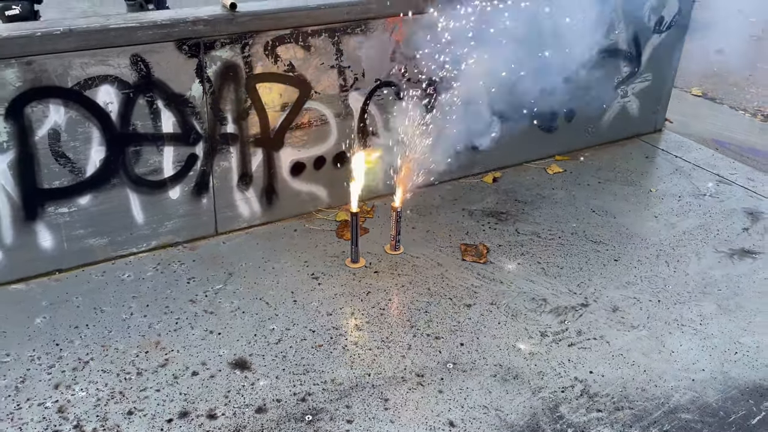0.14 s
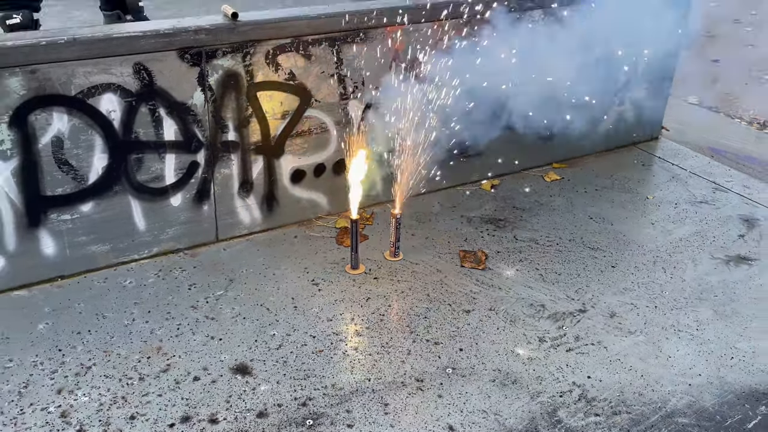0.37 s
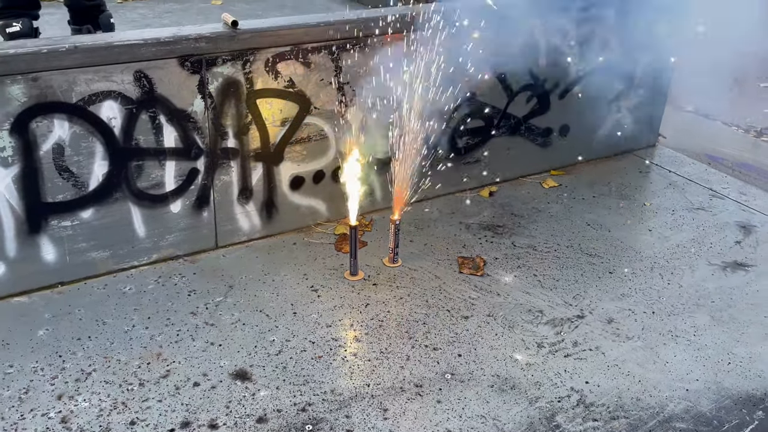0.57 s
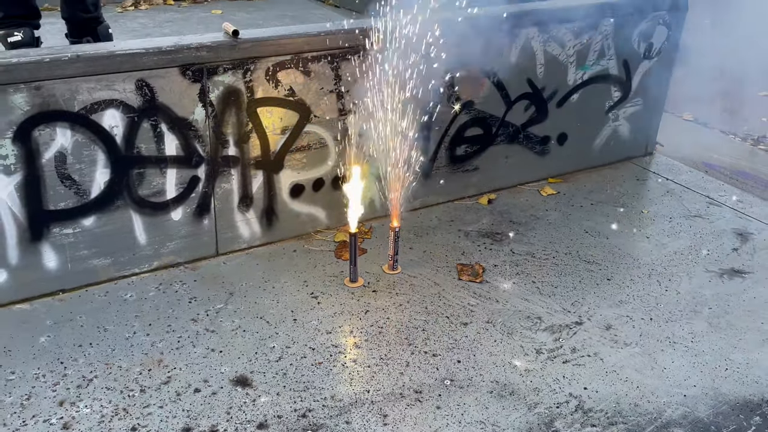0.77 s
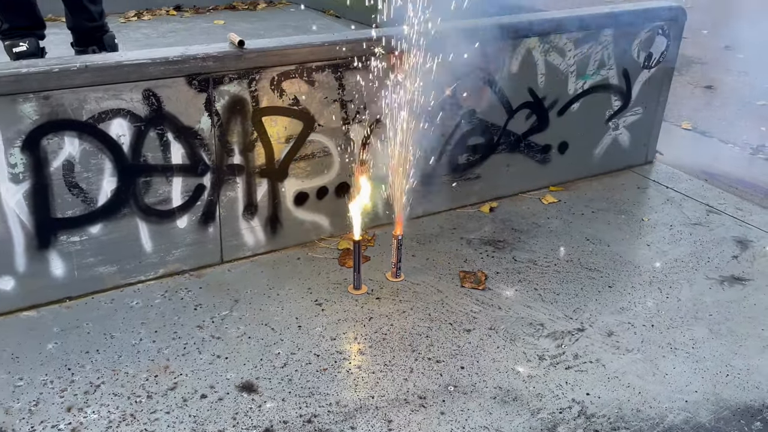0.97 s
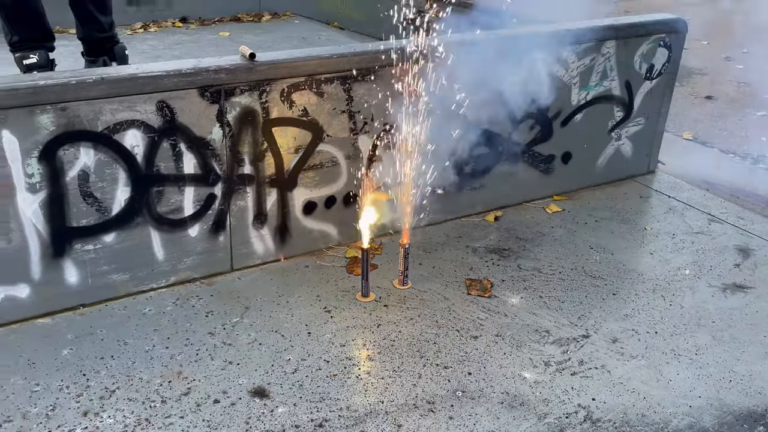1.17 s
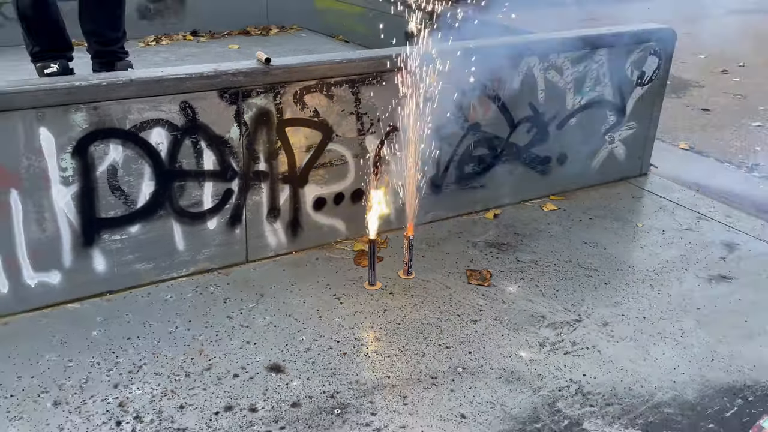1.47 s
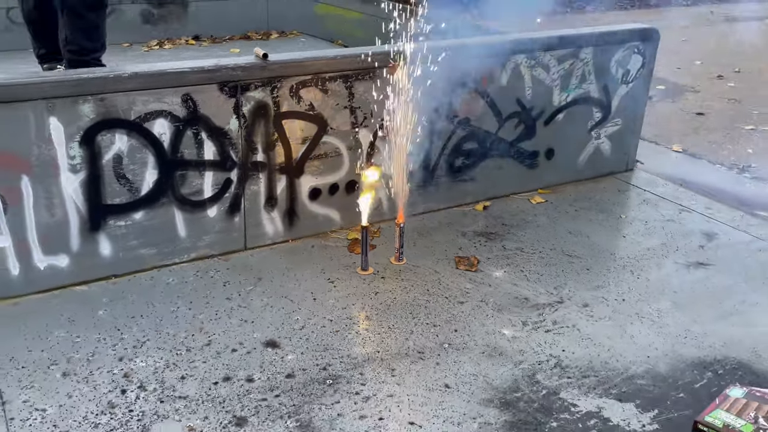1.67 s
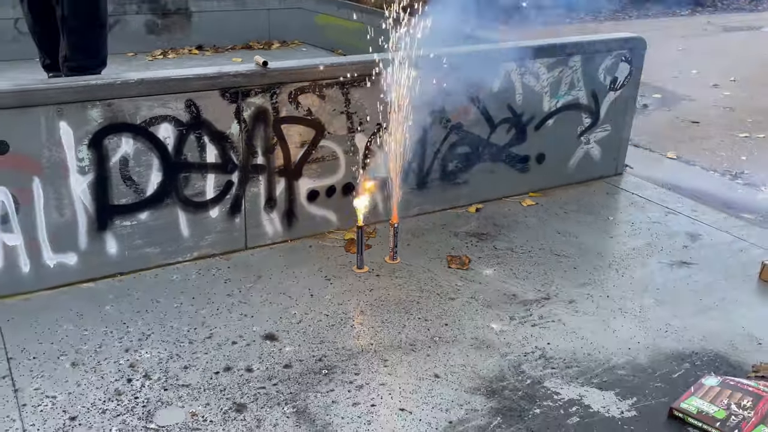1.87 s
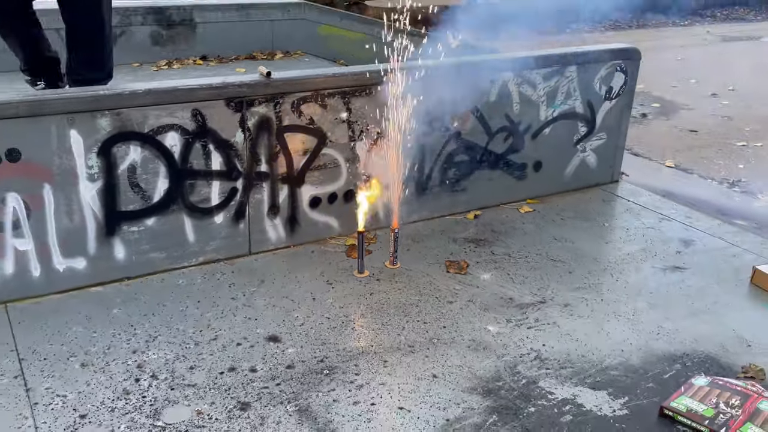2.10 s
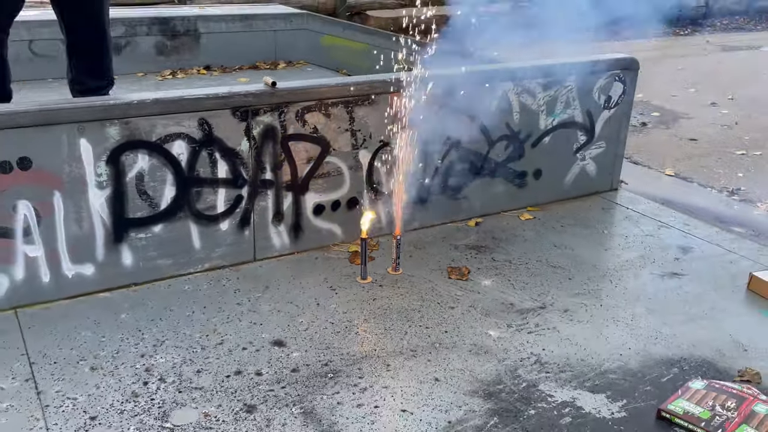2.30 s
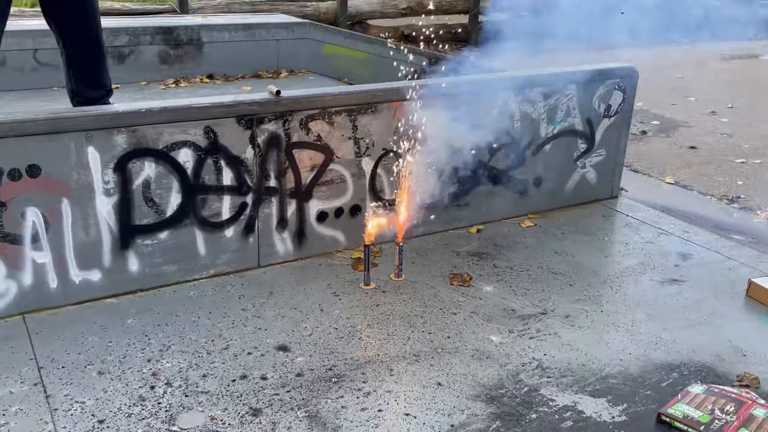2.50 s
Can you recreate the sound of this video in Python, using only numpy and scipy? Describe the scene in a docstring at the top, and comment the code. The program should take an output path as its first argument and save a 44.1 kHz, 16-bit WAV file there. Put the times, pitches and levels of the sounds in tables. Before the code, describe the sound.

A close firework jet rushes up for half a second, breaks into a piercing, rough-edged whistle that slides down and weakens over thin sparkling hiss and sharp cracks, with light outdoor echoes.

```python
"""A small fountain firework whistles shrilly on a pavement in front of a low wall, beside a second one.
First the jets roar and hiss as filtered, flickering noise; then one tube breaks into a tone with overtones
that falls as the fuel burns down, for a while with an octave below.
Fine sparks crackle as random clicks; a few burst with a snap of noise and a falling sine thump.
Decaying noise echoes carry it all into the open square, heard through two close microphone ports."""
import sys
import numpy as np
from scipy import signal
from scipy.fft import rfft, irfft
from scipy.io import wavfile

SR = 44100
rng = np.random.default_rng(int(sys.argv[2]) if len(sys.argv) > 2 else 0)


def master_out(mix):
    """Clip the mix to full scale and print it as 16-bit PCM to the path in sys.argv[1]."""
    frames = np.transpose(np.atleast_2d(mix))
    ceiling = np.clip(frames, -1, 1)
    pcm = np.round(ceiling * 32767).astype(np.int16)
    wavfile.write(sys.argv[1], SR, pcm)


N = 116865
T = np.arange(N) / SR
HZ = np.fft.rfftfreq(2 * N, 1 / SR)


def from_db(db):
    """Decibels to gain."""
    return 10 ** (np.asarray(db) / 20)


def rms_one(x):
    """Scale to unit power."""
    return x / np.sqrt(np.mean(x ** 2) + 1e-20)


def in_time(rows):
    """Join the points of a curve by straight lines."""
    return np.interp(T, *np.transpose(rows))


def level(rows):
    """Gain from a dB curve, all but silent outside its span."""
    return from_db(np.interp(T, *np.transpose(rows), left=-120, right=-120))


def filtered(x, response):
    """Pass a sound through a frequency response."""
    return irfft(rfft(x, 2 * N) * response)[..., :N]


def colour(points):
    """Frequency response from (Hz, dB) points, joined over log frequency."""
    hz, db = np.transpose(points)
    return from_db(np.interp(np.log(HZ + 1), np.log(hz), db))


def drift(rate):
    """Smooth chance of spread 1 that changes about rate times a second."""
    return rms_one(filtered(rng.standard_normal(N), 1 / (1 + (HZ / rate) ** 2)))


def coloured_noise(spectrum):
    """Steady noise of unit power with the given frequency response."""
    return rms_one(filtered(rng.standard_normal(N), spectrum))


def wind():
    """Faint wind on the microphone, a steady low noise."""
    # Each row: frequency in Hz, density in dB per Hz.
    wind_spectrum = [(25, 1), (50, -2.5), (80, -4), (130, -13), (400, -44), (2000, -58)]
    return from_db(-67) * coloured_noise(colour(wind_spectrum))


def echoes(x, db, t60):
    """Scattered reflections as decaying noise, mostly in the middle and treble."""
    tail = rng.standard_normal(N) * from_db(-60 * T / t60)
    tail = tail * (T > .004)  # nothing returns in the first 4 ms
    tail = tail / np.linalg.norm(tail)
    tone = HZ / (HZ + 400) / (1 + (HZ / 7000) ** 2)
    return from_db(db) * filtered(x, rfft(tail, 2 * N) * tone)


def grains(per_s):
    """Random clicks of uneven size and either sign."""
    spread_db = -4.5
    sizes = from_db(spread_db * np.minimum(rng.exponential(1, N), 4)) * rng.choice([-1, 1], N)
    return rms_one(sizes * (rng.random(N) < per_s / SR))


def jet(source, curve, spectrum, flicker_db):
    """Flickering turbulence, heard directly and, a little later and duller, off the pavement."""
    ground_delay_s, ground_share = 0.001029, .42
    bounce = np.exp(-2j * np.pi * HZ * ground_delay_s) / (1 + (HZ / 6000) ** 2)
    noise = rms_one(filtered(source, colour(spectrum) * (1 + ground_share * bounce)))
    return noise * from_db(in_time(curve) + flicker_db * drift(20))  # flickers about 20 times a second


def roar():
    """The jets' low roar, flickering low noise."""
    # Each row: time in seconds, level in dB.
    roar_level = [(0, -50.5), (.1, -40.5), (.22, -36.5), (.4, -35), (.52, -36.5), (.62, -43.5),
                  (.72, -54.5), (1.0, -57), (1.25, -60.5), (1.448, -66.5), (2.001, -73), (2.65, -71.5)]
    # Each row: frequency in Hz, density in dB per Hz.
    roar_spectrum = [(25, -33), (50, -13.5), (90, -8), (140, -2), (240, 1.5), (320, -2), (480, -21.5),
                     (900, -13), (1500, -20.5), (3000, -59)]
    return jet(rng.standard_normal(N), roar_level, roar_spectrum, flicker_db=2)


def blast():
    """The hard jet before the whistle settles, noise that sputters fast."""
    # Each row: time in seconds, level in dB.
    blast_level = [(0, -53.5), (.1, -37), (.2, -34), (.35, -32), (0.388, -23.5), (0.424, -29), (0.508, -26),
                   (.6, -39), (.7, -44.5), (.9, -76)]
    # Each row: frequency in Hz, density in dB per Hz.
    blast_spectrum = [(200, -24), (600, -7), (1150, -15.5), (1450, -13.5), (1750, -10.5), (1980, -2.5),
                      (2350, -8.5), (2750, 3), (3400, -6), (4500, 0), (6000, -3.5), (7500, -11),
                      (10000, -9.5), (12500, -18.5), (14000, -21), (16000, -18)]
    sputter_db, sputter_per_s = 0.8, 270
    sputter = from_db(sputter_db * drift(sputter_per_s))
    return jet(rng.standard_normal(N) * sputter, blast_level, blast_spectrum, flicker_db=1.5)


def hiss():
    """The spark shower's hiss, noise laced with a fine crackle of tiny sparks."""
    # Each row: time in seconds, level in dB.
    hiss_level = [(0, -51.5), (.5, -32.5), (.72, -44.5), (1.051, -44), (1.3, -50), (1.6, -53),
                  (1.849, -50.5), (2.15, -53.5), (2.35, -57.5), (2.65, -75)]
    # Each row: frequency in Hz, density in dB per Hz.
    hiss_spectrum = [(200, -11), (500, -7), (950, -9), (1500, -10), (2000, -7), (3000, 6.5), (4400, -5),
                     (5600, -0.5), (7500, -5.5), (10000, -7), (12000, -7.5), (14000, -16.5), (16000, -19)]
    sparks_per_s, sparks_db = 900, -13.5  # dB against the raw noise
    source = rng.standard_normal(N) + from_db(sparks_db) * grains(sparks_per_s)
    return jet(source, hiss_level, hiss_spectrum, flicker_db=1.32)


def rush():
    """Rushing in the tube mouths, noise with grains spat out."""
    # Each row: time in seconds, level in dB.
    rush_level = [(0, -61), (.3, -42), (.52, -37.5), (.72, -48), (1.05, -49), (1.399, -58.5), (1.85, -51),
                  (2.05, -51.5), (2.159, -52), (2.35, -57), (2.65, -69.5)]
    # Each row: frequency in Hz, density in dB per Hz.
    rush_spectrum = [(1500, -41.5), (2250, -27), (2750, 4.5), (3200, 8), (3800, 7.5), (4300, -30),
                     (7000, -48)]
    spits_per_s, spits_db = 37, -10  # dB against the raw noise
    source = rng.standard_normal(N) + from_db(spits_db) * grains(spits_per_s)
    return jet(source, rush_level, rush_spectrum, flicker_db=3)


def bursts():
    """Each spark burst is a brief snap of noise and a thump that dives from the midrange into the bass."""
    # Each row: start in seconds, snap level in dB, snap length in seconds, snap tilt in dB per octave,
    # thump level in dB, thump swell time in seconds, steepness of its swell and fall.
    burst_rows = [(0.2474, -18.5, 0.0034, 1, -52, .0002, 2), (1.3634, -31.5, 0.01, -1.7, -34, 0.014, 3),
                  (1.3679, -30, 0.0084, -3, -20.5, .0012, 5.2),
                  (1.7545, -31.5, 0.0015, 1, -38.5, 0.0025, 1),
                  (2.0382, -27, .002, -1.1, -27, 0.0031, 1.77),
                  (2.3447, -29, 0.0043, 0.3, -24.5, 0.0028, 1.5)]
    # Each row: frequency in Hz, level in dB.
    snap_spectrum = [(200, -4), (1000, -4.5), (3000, 0.5), (6000, -1.5), (9000, -1.5), (13000, -4),
                     (16000, -18)]
    tilt_from_hz = 250  # the tilt acts above this
    thump_cycles, thump_lead_s, thump_fade_s = 1.208, 0.00051, 0.041  # pitch is cycles / (age + lead)
    out = 0
    for s, snap_db, snap_s, tilt_db, thump_db, swell_s, steepness in burst_rows:
        age = np.maximum(T - s, 0)
        tilt = from_db(tilt_db * np.log2(HZ + tilt_from_hz))
        noise = coloured_noise(colour(snap_spectrum) * tilt)
        snap = from_db(snap_db) * (age > 0) * np.exp(-(age / snap_s) ** 2) * noise
        swell = (2 * age * swell_s / (age ** 2 + swell_s ** 2)) ** steepness  # peaks at age = swell_s
        swell = swell * np.exp(-(age / thump_fade_s) ** 2)
        dive = np.sin(2 * np.pi * thump_cycles * np.log1p(age / thump_lead_s))
        out = out + snap - from_db(thump_db) * swell * dive
    return out


def splutters():
    """Brief puffs of noise as lumps pass the mouth of the whistling tube."""
    # Each row: centre in seconds, level in dB.
    puff_rows = [(0.827, -34.5), (1.507, -37), (1.834, -33.5), (1.861, -39), (2.146, -38), (2.184, -45)]
    # Each row: frequency in Hz, density in dB per Hz.
    puff_spectrum = [(1900, -42), (2400, -23), (2800, -1.5), (3200, 5), (3800, -4.5), (4400, -25),
                     (8000, -44.5)]
    half_length_s = 0.0026
    puffs = sum(from_db(db) * np.exp(-((T - s) / half_length_s) ** 2) for s, db in puff_rows)
    return puffs * coloured_noise(colour(puff_spectrum))


def whistle():
    """The tube's tone with overtones, half lines while its period doubles, and a noisy edge."""
    # Pitch of the tube. Each row: time in seconds, frequency in Hz.
    pitch = [(0.48, 4310), (0.546, 4147), (0.734, 4206), (0.818, 4111), (0.868, 4145), (0.922, 4068),
             (0.956, 4146), (1.094, 4002), (1.216, 3881), (1.232, 3753), (1.282, 3717), (1.676, 3485),
             (1.82, 3365), (1.886, 3370), (2.042, 3249), (2.386, 3221), (2.442, 3260), (2.47, 3260)]
    # The fundamental. Each row: time in seconds, level in dB.
    fundamental = [(0.47, -21), (0.51, -14.5), (0.58, -18.5), (0.59, -12), (0.63, -20.5), (0.65, -15),
                   (0.74, -19), (0.76, -15.5), (0.81, -19), (0.9, -16), (0.92, -23.5), (0.96, -18),
                   (1.02, -20.5), (1.04, -30), (1.09, -30.5), (1.1, -33.5), (1.14, -15.5), (1.22, -17.5),
                   (1.23, -16), (1.42, -26.5), (1.52, -22), (1.63, -27.5), (1.64, -27.5), (1.9, -33),
                   (1.92, -38.5), (1.95, -27.5), (1.98, -38), (2.01, -25), (2.12, -22.5), (2.19, -28),
                   (2.27, -25), (2.42, -32), (2.47, -51.5), (2.49, -66)]
    # Each row: time in seconds, then the second, third and fourth harmonic in dB.
    overtones = [(.46, -66, -72, -90), (.51, -28.5, -49, -80), (.66, -41.5, -42, -82),
                 (.78, -35, -53.5, -65), (1.0, -41.5, -42.5, -79.5), (1.18, -33.5, -39, -45),
                 (1.27, -50.5, -49, -62), (1.42, -36.5, -40, -62), (1.601, -33.5, -38.5, -70),
                 (1.75, -35, -46, -59), (1.899, -33, -48.5, -54.5), (1.98, -32.5, -40, -54),
                 (2.1, -37.5, -41.5, -61.5), (2.3, -43.5, -49, -67), (2.42, -47, -57.5, -75),
                 (2.49, -82.5, -87.5, -88)]
    # Period doubling. Each row: time in seconds, then the lines at 1/2, 3/2, 5/2 and 7/2 of the pitch in dB.
    doubling = [(.62, -59.5, -62, -68.5, -79), (.68, -43, -34.5, -59, -60), (.72, -50, -42.5, -59, -64),
                (.76, -39, -28.5, -47.5, -62), (.88, -41, -28, -40, -55.5), (1.0, -43.5, -27.5, -39, -57),
                (1.17, -52.5, -31, -40, -54), (1.239, -45.5, -44.5, -55, -66.5), (1.32, -68, -65, -73, -65)]
    # The whistle stumbles. Each row: time in seconds, pitch drop in Hz, level drop in dB.
    stumbles = [(0.827, 316.5, 10)]
    # Turbulence ringing just under the pitch. Each row: time in seconds, strength in dB before halving.
    edge_strength = [(.47, -27), (.55, -30.5), (.75, -41), (.95, -36.5), (1.1, -30.5), (1.25, -53),
                     (1.8, -41), (2.15, -40.5), (2.48, -58)]
    stumble_s = .003
    waver_hz, waver_per_s, jitter_hz, jitter_per_s = 7, 27.1, 10, 132  # slow and fast unsteadiness
    flutter_db, flutter_per_s = 0.93, 78
    onset_s, onset_rise_s = .486, .008  # the tube catches
    edge_width_hz, edge_below_hz = 95, 90

    hz = in_time(pitch) + waver_hz * drift(waver_per_s) + jitter_hz * drift(jitter_per_s)
    gain = (1 + np.tanh((T - onset_s) / onset_rise_s)) / 2
    for s, drop_hz, drop_db in stumbles:
        dip = np.exp(-((T - s) / stumble_s) ** 2)
        hz = hz - drop_hz * dip
        gain = gain * from_db(-drop_db * dip)
    phase = 2 * np.pi * np.cumsum(hz) / SR

    under = phase - 2 * np.pi * edge_below_hz * T
    edge = (drift(edge_width_hz) * np.sin(under) + drift(edge_width_hz) * np.cos(under)) / 2
    tone = level(fundamental) * np.sin(phase) * from_db(flutter_db * drift(flutter_per_s))
    out = tone + level(edge_strength) * edge
    for table, lowest in ((np.array(overtones), 2), (np.array(doubling), .5)):
        for k in range(table.shape[1] - 1):
            flutter = from_db(2 * flutter_db * drift(flutter_per_s))  # twice the fundamental's, in dB
            out = out + level(table[:, [0, k + 1]]) * flutter * np.sin((lowest + k) * phase)
    return np.sqrt(2) * gain * out  # a sine's level is thus its rms


def scene():
    """Fireworks, their echoes and a little wind reach two closely spaced microphone ports."""
    # Phase lead of the left port. Each row: frequency in Hz, lead in radians.
    port_phase = [(2350, 0), (3000, .6), (3500, .45), (4100, .15), (5100, .3), (5900, -.15), (7100, -1.3),
                  (8150, -3.14), (10500, -5.3), (11200, -6.2), (12300, -6.6), (13500, -8.3), (14700, -9.4)]
    # Left port above the right. Each row: frequency in Hz, difference in dB.
    balance = [(100, .2), (1200, .4), (2100, 1.2), (3250, 1.7), (3750, 1.4), (4150, .3), (6500, .3),
               (9000, -.1)]
    jets = roar() + blast() + hiss() + rush()
    direct = whistle() + jets + bursts() + splutters()
    wall = echoes(direct, db=-16, t60=0.054)
    square = echoes(direct, db=-24, t60=0.8)
    sideways = echoes(direct, db=-23.5, t60=.04)  # near reflections, opposite in the two ports

    sides = np.array([[.5], [-.5]])  # left and right each take half of every difference
    air = direct + wind() + wall + square + 2 * sides * sideways
    lead = np.exp(1j * sides * np.interp(HZ, *np.transpose(port_phase)))
    return filtered(air, lead * colour(balance) ** sides)


def record(dry):
    """The deep bass is rolled off and the top is cut steeply."""
    low_cut_hz, cutoff_hz = 40, 16000
    thin = signal.sosfilt(signal.butter(3, low_cut_hz, "high", fs=SR, output="sos"), dry)
    return signal.sosfiltfilt(signal.ellip(10, .1, 60, cutoff_hz, fs=SR, output="sos"), thin)


dry = scene()
out = record(dry)
master_out(out)
```